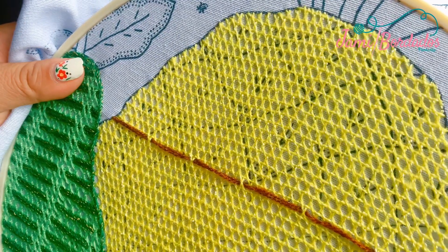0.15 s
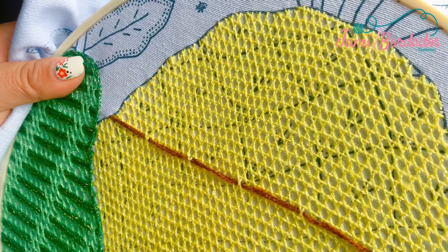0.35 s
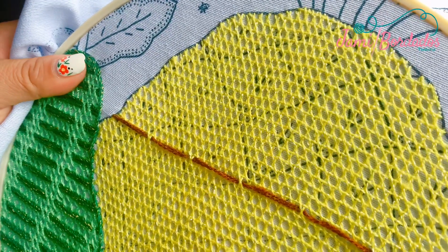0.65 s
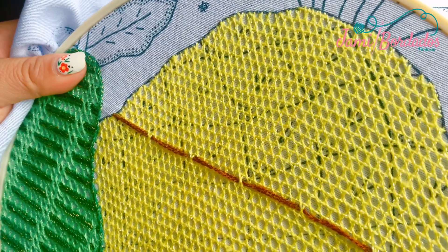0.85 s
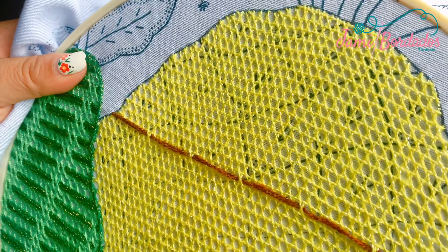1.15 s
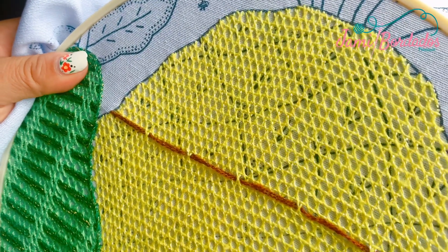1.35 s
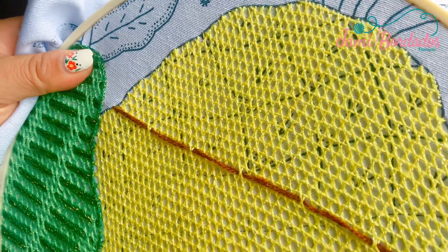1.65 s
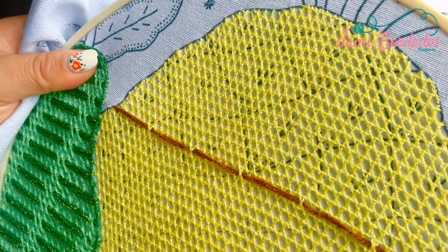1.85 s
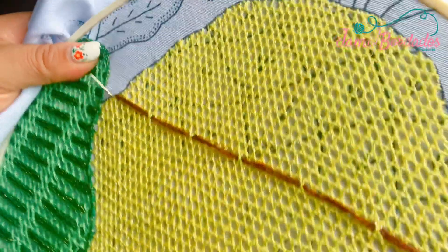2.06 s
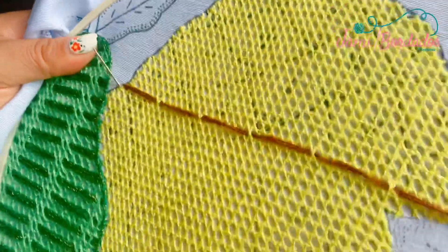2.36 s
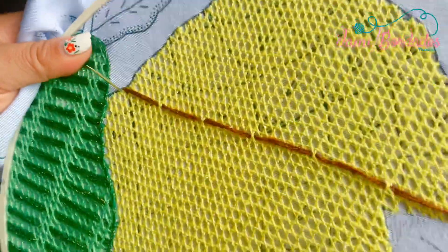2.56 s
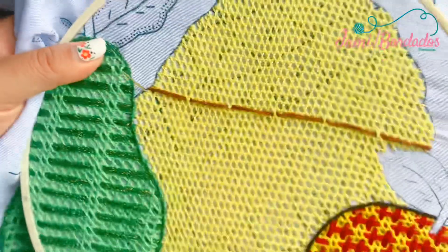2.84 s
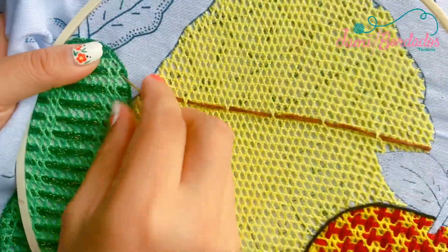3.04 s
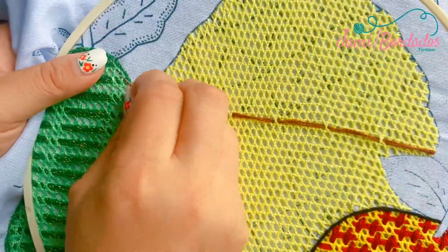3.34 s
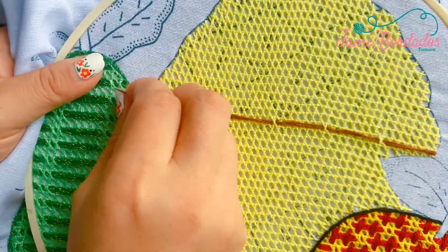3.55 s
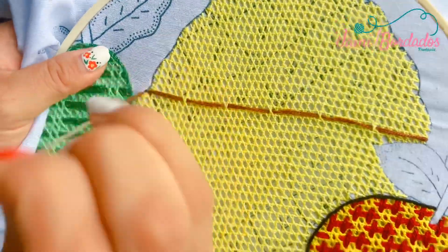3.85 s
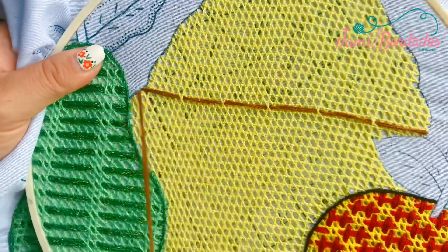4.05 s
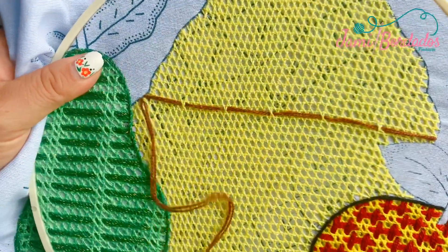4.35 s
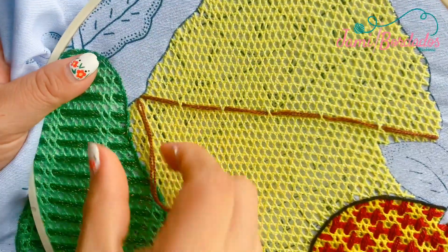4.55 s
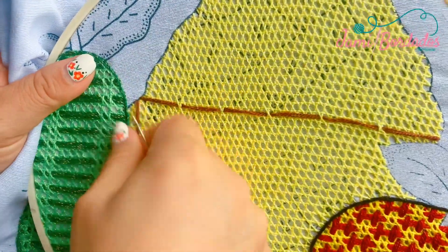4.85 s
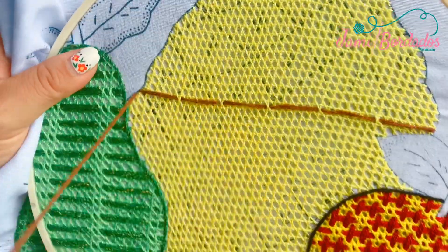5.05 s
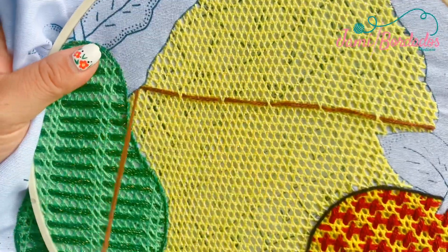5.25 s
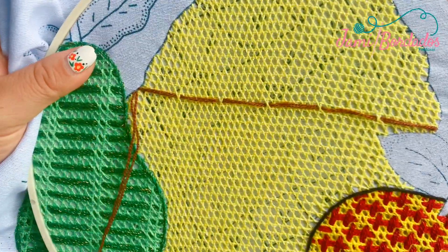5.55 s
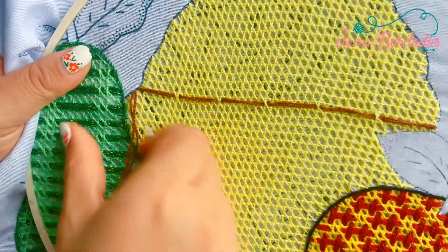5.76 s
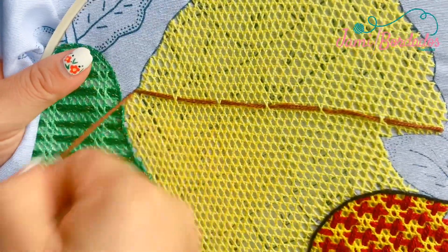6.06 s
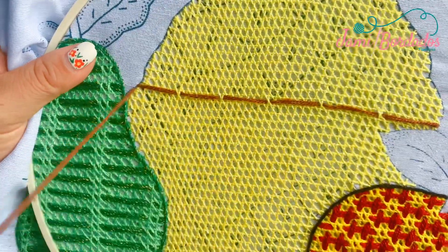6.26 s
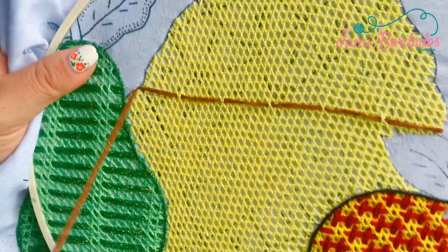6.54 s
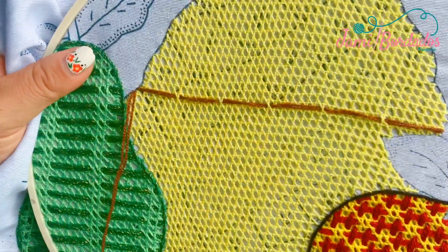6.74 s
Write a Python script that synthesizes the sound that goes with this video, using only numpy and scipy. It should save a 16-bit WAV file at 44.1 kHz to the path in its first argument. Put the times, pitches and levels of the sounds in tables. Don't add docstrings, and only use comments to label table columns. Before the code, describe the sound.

Close-miked embroidery indoors over a wavering low hum. First almost nothing but small nail ticks; then light taps, short dry rubs, a low hoop creak and tiny squeaks. One hard snap of the cloth begins a hissing thread pull; two more follow, gritty and uneven, with little snags and dull hoop thumps. Soft hand brushes fill the gaps, and the hum remains at the end.

```python
import sys
import numpy as np
from scipy import signal
from scipy.fft import rfft, irfft
from scipy.io import wavfile
from scipy.ndimage import uniform_filter1d

SR = 44100
rng = np.random.default_rng(int(sys.argv[2]) if len(sys.argv) > 2 else 0)


def store_wav(level_fs):
    pcm = np.round(np.clip(np.atleast_2d(level_fs), -1, 1) * 32767)
    wavfile.write(sys.argv[1], SR, pcm.T.astype(np.int16))


def magnitude_from_level(level_db):
    exponent = np.asarray(level_db, float) / 20
    return 10 ** exponent


N = 304290
T = np.arange(N) / SR

# time in seconds, speed as hiss in dB, drag in dB.
PULLS = [
    [(3.745, -52.5, 1), (3.752, -53, 2.5), (3.784, -50, 7), (3.944, -44.5, 9.5), (4.062, -42.5, 9),
     (4.114, -41, 8), (4.148, -47.5, 3), (4.172, -71, 8.5), (4.2, -76.5, 7.5)],
    [(4.825, -66.5, 7.5), (4.905, -45, 3.5), (5.016, -42, 5.5), (5.068, -42, 10.5), (5.11, -42.5, 9),
     (5.178, -44.5, 13.5), (5.28, -48.5, 8.5), (5.325, -75, 12), (5.37, -90, 11)],
    [(5.93, -72.5, 9), (6.05, -46, 4.5), (6.118, -45.5, 3.5), (6.256, -46.5, -0.5), (6.29, -47, 4.5),
     (6.326, -45.5, 2.5), (6.476, -46.5, 7.5), (6.486, -68.5, 2.5), (6.6, -91, 11)],
]
HEFT_DB = [-45, -42, -40]
# time in seconds, peak in dB, seconds to fall 20 dB.
TUGS = [
    (4.114, -39, 0.0645),
    (4.912, -37.5, 0.08),
    (5.068, -37.5, 0.07),
    (5.182, -32, 0.0629),
    (6.05, -34.5, 0.0836),
    (6.29, -35, 0.0809),
    (6.442, -39, 0.0172),
]
PULL_EDGE_DB, PULL_EDGE_PER_DRAG = -11.5, 1
FULL_SPEED_DB, HEFT_PER_SPEED = -46, 0.81
# start in
# seconds, length in seconds, slide as hiss in dB, press in dB, weight on the hoop in dB.
RUBS = [(1.905, .04, -68.5, 12.5, 3), (1.978, 0.03, -71.5, 17.5, 8.5), (2.023, .08, -72.5, 8, 8),
        (2.15, 0.077, -68, 3, 12.5), (2.286, .02, -70.5, 8, 19.5), (2.413, .03, -56.5, -4, 2.5),
        (2.469, 0.05, -54.5, -3, 2.5), (2.545, 0.06953, -57, -0.5, 3), (2.627, 0.052, -52, -7, 5.5),
        (2.701, 0.056, -64, 0, 7.5), (2.746, .015, -58, 2, 20), (2.779, .06, -67, 7.5, 5.5),
        (2.876, 0.044, -76, 19.5, -7), (2.939, 0.05, -79, 21.5, -6), (3.019, .02, -78.5, 19.5, -6),
        (3.161, 0.038, -64, 9.5, -12), (3.215, 0.064, -55.5, 4, -8), (3.411, 0.01, -68, 13, -8),
        (3.496, 0.0089, -64, 9.5, -7), (3.55, 0.027, -58, 4, -13), (3.605, .04, -64, 13, -4),
        (3.645, 0.08586, -59.5, 12.5, 1),
        (4.2, .04, -80, 15, 6), (4.32, .1, -85, 8.5, 7.5), (4.55, 0.2566, -74, 2, -6.5),
           (4.68, 0.025, -75, 11.5, -12), (5.51, .03, -93, 30, -4), (5.7, 0.057, -68, 1.5, -1.5),
           (5.76, .06, -71.5, 3.5, -7), (5.85, 0.064, -68, -2, -9)]
RISE_DB_PER_S, FALL_DB_PER_S = 1001, 400
RUB_EDGE_DB, RUB_EDGE_PER_PRESS = -2, 0.44

# frequency in Hz, level in dB.
HISS = [(3800, -14), (5200, -1), (6200, -1), (8200, -3), (9500, 1), (11000, -3), (13000, -2), (14500, -4),
        (15700, -7)]
# frequency in Hz, change in dB.
SKIN = [(3500, 2), (4500, 0.5), (7500, 2.5), (9500, -4.5), (12000, 0.5), (15000, -6)]
# frequency in Hz, level in dB.
CLOTH = [(300, -8.5), (520, -11.5), (720, 4), (1000, -1.5), (1450, -1), (1900, -5), (2400, -12.5),
         (3500, -41.5)]
# frequency in Hz, level in dB.
EDGE = [(1600, -12), (2650, -8.5), (3200, 0), (3700, -11.5), (4500, -8), (5500, 1), (7000, -30)]
# frequency in Hz, change in dB.
SKIN_EDGE = [(2000, 2.5), (2650, 3), (3200, -6.5), (3700, 3), (4500, 1.5), (5200, -2.5)]
# frequency in Hz, width in Hz, level in dB.
WEAVE = [(760, 177, 0), (1084, 200, -5), (1473, 280, -1), (1950, 360, -7.5)]
WEAVE_DB = -4
# frequency in Hz, width in Hz, level in dB.
HOOP = [(125.52, 67, -1), (185, 87, -4.5), (288, 60, -2.5), (405, 80, -5.5)]
CUP_FROM_S, CUP_TO_S, OPEN_RING, CUP_RING, HOLLOW_HZ = 3.155, 3.61, 0.18, 6.3, 980

# time in seconds, peak in dB, ring in Hz, thud over the ring in dB,
# ring t60 in seconds.
TAPS = [(1.938, -38, 1000, -12, 0.017), (1.944, -38.5, 1300, -4, .014), (1.976, -26, 1060, -11.5, .025),
        (1.9755, -28, 1750, -20.5, 0.013), (2.079, -36, 1150, -13, 0.013), (2.731, -34.5, 700, 7, .035),
        (2.737, -37, 540, -7.5, .035), (2.435, -37.5, 1150, -1, 0.03), (2.484, -44, 1100, -9.5, 0.04076),
        (1.65, -46, 600, 0, .03), (3.65, -36, 1000, -6, .015), (2.2, -47, 720, -8, .02),
        (2.828, -47, 1150, -12, .02), (2.883, -39, 1180, -11.5, 0.017), (2.893, -42, 1100, -12, .015),
        (2.912, -42, 1270, -14, .02), (2.953, -43, 1300, -14, .015), (3.3, -43, 900, -12, .015),
        (2.939, -39.5, 760, -6, 0.046), (3.022, -44, 930, -13.5, 0.076), (3.087, -44, 800, -3, 0.025),
        (3.6202, -22, 900, -3, 0.014), (4.1, -34, 1040, -0.5, 0.014), (5.8, -49, 892.1, -9.5, .04),
        (5.486, -38, 778, -7.5, 0.048)]
SNAGS = [(3.786, -37, 700, -10, .02), (4.107, -26.5, 797, -12, .02), (4.837, -43.5, 797, -5.5, .02),
         (4.872, -41, 767, -10, .02), (6.088, -33.5, 775, -10, .02), (6.165, -34.5, 724, -8, 0.016),
         (2.002, -42, 840, 6, .03), (3.868, -33.5, 774.9, -12, .02), (4.031, -27.5, 1098, -14, .02),
         (4.054, -28.5, 897, -15, .02), (4.072, -25.5, 715, -12, .025), (4.911, -33, 760, -10, .02),
         (4.982, -28.5, 705, -12.5, .02), (5.037, -28.5, 1520, -14, 0.022),
         (5.218, -23.5, 1498, -15, 0.016), (5.227, -26, 900.2, -15, .015), (5.27, -33, 1298, -11.5, .015),
         (6.05, -31.5, 760, -6, .02), (6.242, -34, 773.8, -7.5, .015), (6.292, -30, 1297, -15, .02),
         (6.336, -33, 1500, -12.5, .015), (6.386, -32, 1495, -14, .02), (6.406, -33, 700, -11.5, .015),
         (6.438, -30, 785, -8, .02), (6.455, -30, 1390, -14, .015), (3.981, -23, 1534, -14.5, .03),
         (3.992, -24, 1390, -12, 0.016), (4.938, -30, 800.1, -6.5, 0.022), (5.172, -28, 980, -10, .03),
         (5.181, -21.5, 1173, -13.5, 0.033), (5.302, -30.5, 876.7, -1.5, 0.025),
         (6.018, -29.5, 735.5, -5.5, .03), (6.122, -32, 791.9, -7.5, 0.018), (6.18, -30, 900.9, -12.5, .02),
         (6.206, -29, 672.8, -15, .022), (6.277, -25, 735, -0.5, 0.028), (6.365, -33, 729.8, -14.5, 0.016)]
POP = [
    (3.707, -26, 819.6, 2, 0.0197),
    (3.7287, -16.5, 684, -20, 0.016),
    (3.7307, -9.5, 1635.2, -20, 0.0084),
    (3.7305, -14.5, 1080, -19, 0.012417),
    (3.7313, -11.5, 699.77, -19.5, 0.01572),
]
TAP_CRACK_DB, SNAG_CRACK_DB, POP_CRACK_DB = -29, -16, -24
FUZZ = [0.36, 0.4, 0.11]

# time in seconds, peak in dB, centre in Hz, cloth ring over the
# tick in dB, t60 in seconds.
TICKS = [(0.3284, -51, 9978, 6, 0.0058), (0.3349, -46, 10000, 4, 0.005), (.3427, -35.5, 9008, -1.5, 0.0062),
         (.615, -40.5, 4093, -5, 0.0091), (1.649, -43.5, 7751, 3.5, 0.016), (2.756, -31, 6214, -12, 0.07),
         (3.6206, -23, 5000, -6, 0.01), (3.731, -27, 4525, -6, .012), (4.7058, -43.5, 4500, -13.5, 0.02379),
         (5.301, -36.5, 8993, -6, 0.02), (5.6811, -47, 4500, -3.5, 0.01259), (6.8, -48, 2780, -8, 0.02286)]
TICK_RISE = 0.088
WIDE_HZ, WIDEN = 5000, 0.89
# middle in seconds, half length in seconds, peak in dB, pitch in Hz.
SQUEAKS = [(2.43, 0.01302, -58, 8512), (2.487, 0.013, -49, 7243), (2.761, 0.013, -49, 3250),
           (2.599, .015, -56.5, 7500), (2.675, .022, -56, 3150), (3.182, 0.0094, -61, 7735),
           (3.23, 0.0099, -52.5, 7800), (3.268, 0.012, -51, 8200), (3.252, 0.029, -53, 4270),
           (5.742, 0.02947, -68, 7100), (5.862, 0.03135, -62.5, 6500)]
SQUEAK_WIDTH_HZ = 900
# middle in seconds, half length in seconds, peak in dB,
# centre in Hz, width in Hz.
SCUFFS = [(.6158, 0.00082, -45, 6300, 1800), (.6158, 0.00096, -49, 4000, 1000),
          (0.626, .015, -70, 6940, 1500), (1.394, .003, -61.5, 1900, 500), (1.507, .002, -61, 1500, 900),
          (1.682, .004, -63, 1900, 500), (1.785, .002, -61, 1900, 600), (1.792, 0.0021, -59.5, 1600, 700),
          (1.89, .02, -62, 1600, 300), (3.088, 0.0033, -54, 2100, 900), (3.027, 0.0072, -63, 3870, 600),
          (3.412, .003, -45.5, 7950, 4000), (3.4115, .003, -51, 15000, 2000),
          (3.412, .003, -47, 4200, 2000), (3.4115, .003, -48, 1400, 1400), (3.429, .015, -66, 7500, 3000),
          (3.4965, 0.0046, -43, 7900, 4500), (3.4965, .004, -46, 14500, 2500),
          (3.4973, 0.0053, -46, 4500, 2000), (3.4965, .004, -48, 1600, 1400), (3.18, .02, -58, 3800, 1200),
          (5.489, .0025, -45, 1250, 900), (5.49, 0.0027, -56.5, 2770, 1000), (5.537, .002, -59, 1600, 900),
          (5.803, .003, -59, 1590, 900), (4.218, 0.0087, -59.5, 1900, 600)]

# time in seconds, slips a second, level in dB.
CREAK = [
    (2.2135, 200, -28.5),
    (2.226, 240, -29),
    (2.25, 240, -28.5),
    (2.262, 215, -29),
    (2.268, 150, -29),
    (2.277, 120, -26.5),
]
# frequency in Hz, width in Hz, level in dB.
CREAK_BODY = [(247, 97, 0), (437, 170, -3), (735, 310, 1), (1900, 420, -6), (3160, 550, -13.5),
              (4500, 800, -8.5), (7500, 2000, -17)]
# time in seconds, peak in dB, frequency in Hz, t60 in seconds.
JOLTS = [(1.7, -34, 76.3, 0.17), (2.273, -17.5, 62.8, 0.096), (2.276, -22, 143.7, .08),
         (2.458, -28.5, 49, 0.16), (2.757, -23.5, 53.8, .15), (3.735, -27, 44.3, 0.31),
         (5.163, -24.5, 56.5, 0.16048), (3.7295, -11.5, 250, 0.03141), (3.733, -17, 170, 0.049),
         (2.735, -30, 160, .06), (7, -28.5, 150, 0.069), (4.893, -29.5, 115.5, 0.056),
         (5.168, -26, 135, .05)]

# frequency in Hz, lead of the left in radians.
LEAD = [(0, -.1), (90, -.12), (200, -.35), (450, -.3), (700, 0), (1500, 0), (2900, 1.4), (4500, 2.2),
        (4950, 3.14), (5600, 3.14), (6700, 5), (7500, 6.28), (9000, 6.28), (10900, 8.3), (11300, 9.42),
        (13300, 9.42), (13700, 10.6), (14900, 12.57)]
# frequency in Hz, left minus right in dB.
TILT = [(85, -1), (130, -3.5), (200, -5), (450, -5), (750, -2), (1300, 0), (1800, -1), (2900, -6),
        (4000, -3), (4900, 0)]
# frequency in Hz, likeness from 0 to 1.
SAME = [(100, .98), (400, .97), (520, .85), (750, .99), (1500, .998), (2100, .9), (3000, .75), (4400, .75),
        (4950, .985), (5600, .985), (6400, .7), (7600, .97), (10300, .8), (11300, .99), (13300, .995),
        (13700, .8), (14500, .8), (15000, .97)]
# frequency in Hz, likeness from 0 to 1.
AIR_SAME = [(60, .995), (200, .93), (370, .5), (1000, .35), (3500, .4), (5300, .95), (6500, .6),
            (7600, .97), (8900, .97), (10000, .7), (11300, .97), (13600, .97), (14300, .6), (15200, .9)]
# time in seconds, share of the way across from 0 to 1.
ACROSS = [(1.8, .2), (2.4, .1), (3.4, .3), (3.72, .3), (3.76, .8), (4.15, .8), (4.8, .1), (5.22, .2),
          (5.28, .8), (5.9, .2), (6.24, .2), (6.36, 1), (6.42, .9), (6.5, .3)]
KNEE_HZ, STRETCH, SWAY = 12300, 2.3, .2
NEAR_FROM_S, ASLANT = 1.8, 0.28

# frequency in Hz, t60 in seconds.
ROOM = [(200, 0.14), (1000, 0.14), (4000, 0.11), (12000, 0.033)]
HUM_HZ = 58.6
# time in seconds, level in dB.
HUM_LEVEL = [(0.0, -31.5), (0.33, -29), (1.75, -30.5), (1.94, -32.5), (2.08, -31), (2.19, -34.5),
             (2.4, -29.5), (2.46, -34), (2.7, -32), (4.13, -34.5), (4.26, -44), (4.38, -36), (5.01, -36),
             (5.17, -38), (5.4, -34), (5.84, -38.5), (6.05, -37), (6.9, -37)]
# time in seconds, peak in dB, seconds to fall 20 dB.
SWELLS = [(.33, -42, 0.6562), (1.15, -43, 0.1), (1.6, -46, 0.45), (1.94, -36, 0.08), (2.19, -34, 0.27),
          (2.46, -39, 0.15), (3.3, -46, 0.2416), (3.75, -41, 0.4421), (4.28, -53.5, .5),
          (4.69, -36.5, 0.2926), (5.25, -50.5, 0.1), (5.65, -51, 0.0448), (6.01, -42.5, 1)]
# frequency in Hz, width in Hz, level in dB.
MOTOR_LINES = [(118.3, 15.587, -57), (180, 10.7, -58.5), (32.96, 5, -64.5)]
# frequency in Hz, density in dB per Hz.
AIR = [(25, -15), (60, -4.5), (110, -9.5), (170, -7), (250, -9.5), (370, -22.5), (520, -31), (1100, -32),
       (1700, -32.5), (2100, -44), (4000, -46), (6000, -44.5), (13000, -47.5), (16000, -48.5)]
# time in seconds, level in dB.
AIR_LEVEL = [(0, -55), (1.5, -52), (3.3, -52), (4.4, -53.5), (5.6, -53), (6.9, -52)]
EDGE_HZ = 15700


def evened(x):
    return x / np.sqrt(np.mean(x ** 2) + 1e-20)


def read(points, hz):
    f, value = np.transpose(points)
    return np.interp(np.log(hz + 1), np.log(f + 1), value)


def add(mix, s, sound):
    part = mix[round(s * SR):][:len(sound)]
    part += sound[:len(part)]


def rising(t, seconds):
    return 1 - np.exp(-t / seconds)


def dying(t, t60):
    return magnitude_from_level(-60 * t / t60)


def resonate(x, hz, width):
    turn = np.exp(2j * np.pi * np.cumsum(hz * np.ones(len(x))) / SR)
    r = np.exp(-np.pi * abs(width) / SR)
    return 2 * (turn * signal.lfilter([1 - r], [1, -r], x / turn)).real


def steep(x, hz, width):
    return resonate(resonate(x, hz, width), hz, width)


def body(x, modes):
    return evened(sum(magnitude_from_level(db) * steep(x, hz, width) for hz, width, db in modes))


def colour(x, points):
    gain = magnitude_from_level(read(points, np.fft.rfftfreq(N, 1 / SR)))
    return evened(irfft(rfft(x) * gain, N))


def slips(per_s, spread_db, hush):
    size = magnitude_from_level(spread_db * np.minimum(rng.exponential(1, N), 4))
    size = size * rng.choice([-1., 1.], N)
    clicks = evened(size * (rng.random(N) < per_s / SR))
    return clicks + hush * rng.standard_normal(N)


def flutter(ms, depth_db):
    smooth = np.hanning(int(ms * SR / 1000))
    return magnitude_from_level(depth_db * evened(signal.oaconvolve(rng.standard_normal(N), smooth, "same")))


def patchy(x, depth_db):
    z = signal.stft(x, nperseg=256)[2]
    patches = uniform_filter1d(rng.standard_normal(z.shape), size=9, axis=0)
    patches = uniform_filter1d(patches, size=14, axis=1)
    return evened(signal.istft(z * magnitude_from_level(depth_db * evened(patches)), nperseg=256)[1][:N])


def swells(rows):
    return sum(magnitude_from_level(db - 20 * abs(T - s) / spread) for s, db, spread in rows)


def pulls():
    gains = np.zeros((4, N))
    for rows, heft_db in zip(PULLS, HEFT_DB):
        s, speed, drag = np.transpose(rows)
        speed = np.interp(T, s, speed, -200, -200)
        drag = np.interp(T, s, drag)
        edge = speed + PULL_EDGE_DB + PULL_EDGE_PER_DRAG * drag
        rumble = heft_db + HEFT_PER_SPEED * (speed - FULL_SPEED_DB)
        gains += magnitude_from_level(np.array([speed, speed + drag, edge, rumble]))
    gains[-1] = np.hypot(gains[-1], swells(TUGS))
    return gains


def strokes():
    s, length, slide, press, weight = np.transpose(RUBS)[:, :, None]
    t = T[::32]
    early, late = np.maximum(s - t, 0), np.maximum(t - s - length, 0)
    shape = magnitude_from_level(-RISE_DB_PER_S * early - FALL_DB_PER_S * late)
    rasp = slide + press
    edge = slide + RUB_EDGE_DB + RUB_EDGE_PER_PRESS * press
    levels = magnitude_from_level(np.hstack([slide, rasp, edge, rasp + weight]))
    gains = np.sqrt((levels ** 2).T @ shape ** 2)
    return np.array([np.interp(T, t, g) for g in gains]) * flutter(20, 2.0)


def rub():
    grip = flutter(3, 1.8)
    fine = slips(3000, 8.0, 1.87) * flutter(11, 0.37)
    coarse = slips(1000, 3.6, 0.7) * grip
    rumble = slips(400, 2.5, 0.95) * grip
    drawn, stroked = pulls(), strokes()
    rasp_gain, rumble_gain = np.hypot(drawn, stroked)[1::2]

    rings = sum(magnitude_from_level(db) * body(slips(260, 3.6, .4) * flutter(12, 1.6), [(hz, width, 0)])
                for hz, width, db in WEAVE)
    cloth = patchy(colour(coarse, CLOTH) + magnitude_from_level(WEAVE_DB) * evened(rings), 1.26)
    share = np.select([T < CUP_FROM_S, T < CUP_TO_S], [OPEN_RING, CUP_RING])
    hollow = evened(resonate(cloth, HOLLOW_HZ, 90))
    cupped = (cloth + share * hollow) / np.sqrt(1 + share ** 2)

    hiss = patchy(colour(fine, [(2500, -39.5)] + HISS), 2.35)
    edge = patchy(colour(coarse + 1.8 * fine, EDGE), 2.3)
    out = magnitude_from_level(2.5) * (drawn[0] * hiss + stroked[0] * colour(hiss, SKIN))
    out += rasp_gain * cupped
    out += magnitude_from_level(2.74) * (drawn[2] * edge + stroked[2] * colour(edge, SKIN_EDGE))
    return out + rumble_gain * body(rumble, HOOP)


def taps():
    out, t = np.zeros(N), np.arange(3000) / SR
    counts = [len(TAPS), len(SNAGS), len(POP)]
    cracks_db = np.repeat([TAP_CRACK_DB, SNAG_CRACK_DB, POP_CRACK_DB], counts)
    fuzz = np.repeat(FUZZ, counts)
    noise = rng.standard_normal((len(cracks_db), 2, len(t)))
    dull = signal.butter(6, 2300, fs=SR, output="sos")
    rise = rising(t, .0003)
    thud = np.sin(2 * np.pi * 210 * t) * rising(t, 0.0011) * dying(t, 0.047)
    for (s, db, hz, thud_db, t60), crack_db, rough, (a, b) in zip(TAPS + SNAGS + POP, cracks_db, fuzz, noise):
        snap = rise * evened(steep(a, 1650, 800)) * dying(t, .012)
        tone = np.sin(2 * np.pi * hz * t) + rough * evened(resonate(a, 1.22 * hz, 630))
        ring = rise * dying(t, max(t60, .004)) * tone + rough * snap
        ring = signal.sosfilt(dull, ring)
        crack = rise * evened(steep(b, 3233, 1401.7)) * dying(t, 0.0086)
        add(out, s, magnitude_from_level(db) * (ring + magnitude_from_level(crack_db + 5.0) * crack + magnitude_from_level(thud_db) * thud))
    return out


def ticks():
    out, t = np.zeros(N), np.arange(3000) / SR
    for (s, db, hz, ring_db, t60), a in zip(TICKS, rng.standard_normal((len(TICKS), len(t)))):
        width = hz * (hz / WIDE_HZ) ** WIDEN
        burst = a * rising(t, TICK_RISE * t60) * dying(t, max(t60, .004))
        ring = steep(burst, 1100, 1400)
        add(out, s, magnitude_from_level(db - 5.5) * (steep(burst, hz, width) + magnitude_from_level(ring_db + 18.0) * ring))
    return out


def squeaks():
    out, t = np.zeros(N), np.arange(-4000, 4000) / SR
    rows = [row + (SQUEAK_WIDTH_HZ,) for row in SQUEAKS] + SCUFFS
    for (s, half, db, hz, width), a in zip(rows, rng.standard_normal((len(rows), len(t)))):
        band = evened(steep(a, hz, width))
        add(out, s + t[0], magnitude_from_level(db) * np.exp(-(t / half) ** 2) * band)
    return out


def creak():
    s, per_s, db = np.transpose(CREAK)
    rate = np.interp(T, s, per_s, 0, 0) * flutter(5, .12)
    turns = .97 + np.cumsum(rate) / SR
    pulses = np.diff(np.floor(turns), prepend=0) * flutter(3, .8)
    puffs = signal.lfilter([1], [1, -.97], pulses) * rng.standard_normal(N)
    drive = (pulses + 0.089 * puffs) * magnitude_from_level(np.interp(T, s, db))
    ring = np.zeros(N)
    for k, (hz, width, mode_db) in enumerate(CREAK_BODY):
        mode = resonate(resonate(drive, hz, width), hz, 1.821 * width) / width
        ring += (-1) ** k * magnitude_from_level(mode_db) * mode
    return ring * magnitude_from_level(82.0)


def jolts():
    out, t = np.zeros(N), np.arange(SR // 3) / SR
    for s, db, hz, t60 in JOLTS:
        add(out, s, magnitude_from_level(db) * dying(t, t60) * np.sin(2 * np.pi * hz * t) * rising(t, 0.0019))
    return out


def ports(x, other, same, stretch=1):
    hz = np.fft.rfftfreq(N, 1 / SR)
    hz = np.minimum(hz, KNEE_HZ + (hz - KNEE_HZ) / stretch)
    c = np.clip(read(same, hz), 0, 1)
    tilt = magnitude_from_level(read(TILT, hz) / 2)
    lag = np.exp(-1j * np.interp(hz, *np.transpose(LEAD)))
    left = rfft(x)
    right = (c * left + np.sqrt(1 - c ** 2) * rfft(other)) * lag
    return irfft(np.array([left * tilt, right / tilt]), N)


def scatter(x):
    z = signal.stft(x, nperseg=128)[2]
    y = signal.istft(z * np.exp(2j * np.pi * rng.random(z.shape)), nperseg=128)[1][:N]
    return evened(y) * np.std(x)


def hands(x):
    other = scatter(x)
    sway = np.log(flutter(60, 20 / np.log(10)))
    across = np.clip(np.interp(T, *np.transpose(ACROSS)) + SWAY * sway, 0, 1)
    return (1 - across) * ports(x, other, SAME) + across * ports(x, other, SAME, STRETCH)


def tail(seconds):
    hz, t, z = signal.stft(rng.standard_normal(int(seconds * SR)), SR, nperseg=128)
    echo = signal.istft(z * dying(t, read(ROOM, hz)[:, None]), SR, nperseg=128)[1]
    return echo / np.linalg.norm(echo)


def hum():
    tone = np.sqrt(2) * np.sin(2 * np.pi * HUM_HZ * T + 1.88)
    drone = body(rng.standard_normal(N), [(73.0, 20.394, 0)])
    level_db = np.interp(T, *np.transpose(HUM_LEVEL))
    lines = sum(magnitude_from_level(db) * body(rng.standard_normal(N), [(hz, width, 0)]) for hz, width, db in MOTOR_LINES)
    return magnitude_from_level(level_db) * tone + swells(SWELLS) * drone + lines


def air():
    frames, hz = N // 256 + 5, np.fft.rfftfreq(1024, 1 / SR)[:, None]
    a, b, c, d, patches = rng.standard_normal((frames, 513, 5)).T
    patches = evened(uniform_filter1d(uniform_filter1d(patches, 14, 0), 10, 1))
    depth_db = np.clip(2400 / (hz + 1), .9, 2.6)
    z = np.array([a + 1j * b, c + 1j * d]) * magnitude_from_level(read(AIR, hz) + depth_db * patches)
    wash = evened(signal.istft(z, nperseg=1024, noverlap=768)[1][:, :N])
    return magnitude_from_level(np.interp(T, *np.transpose(AIR_LEVEL))) * wash


def scene():
    tick, squeak = ticks(), squeaks()
    ahead = tick * np.where(T < NEAR_FROM_S, 1, ASLANT) + squeak * (T < NEAR_FROM_S)
    work = rub() + taps() + creak() + jolts() + squeak + tick - ahead
    left, right = (signal.oaconvolve(work + ahead, tail(0.19))[:N] for _ in range(2))
    near = hands(work) + ahead + magnitude_from_level(-20) * ports(left, right, AIR_SAME)
    motor = hum()
    return near + ports(motor, 0 * motor, AIR_SAME) + ports(*air(), AIR_SAME)


def top_cut(x):
    return signal.sosfilt(signal.butter(12, 16810, fs=SR, output="sos"), x)


def record(dry):
    edge = signal.firwin(511, EDGE_HZ, window=("kaiser", 9), fs=SR)
    mix = signal.oaconvolve(dry, edge[None], "same")
    return top_cut(mix)


dry = scene()
out = record(dry)
store_wav(out)
```